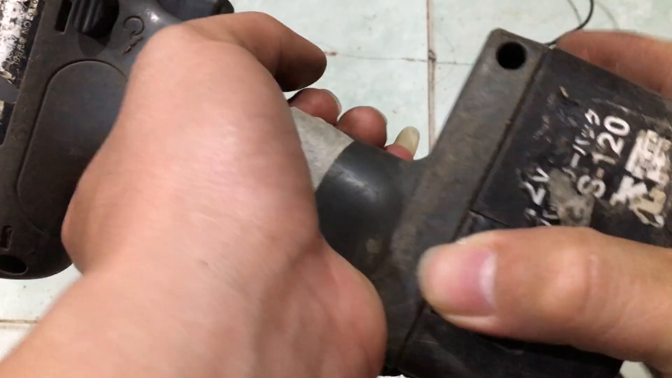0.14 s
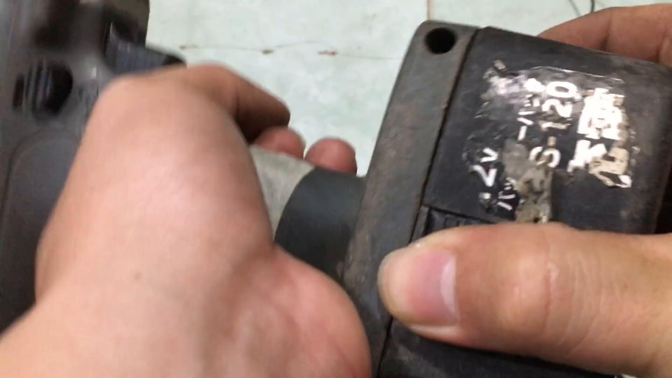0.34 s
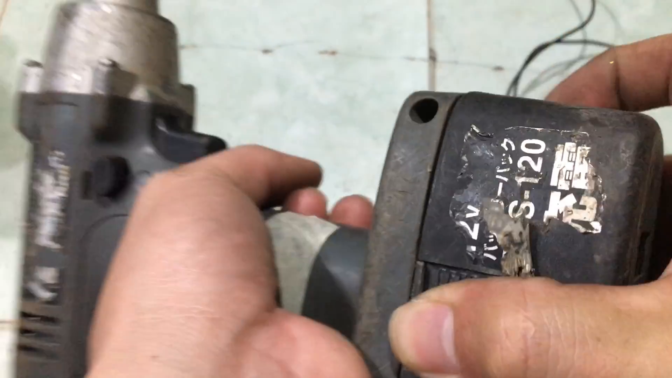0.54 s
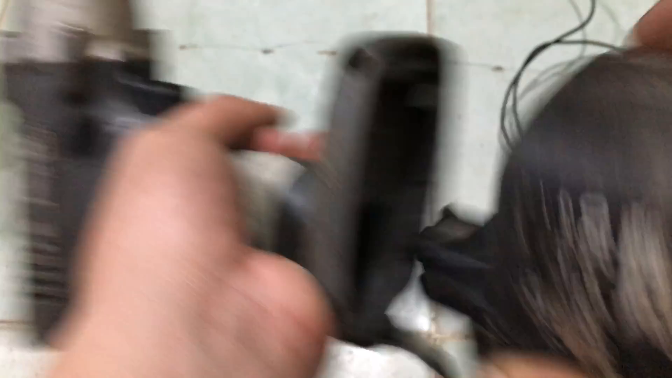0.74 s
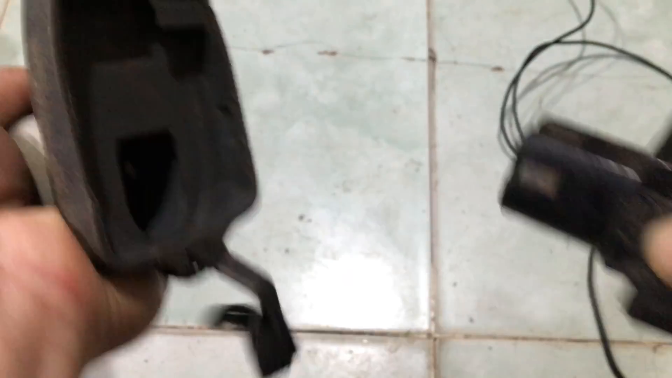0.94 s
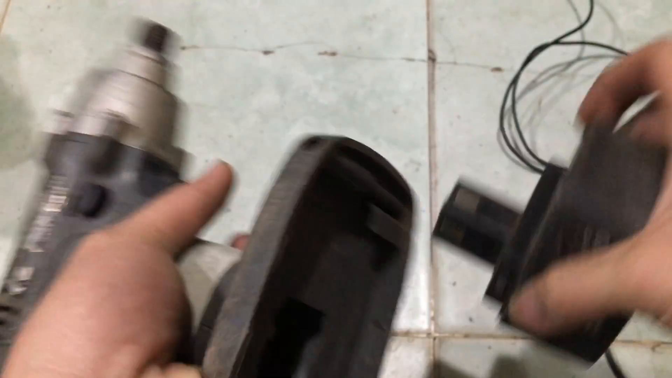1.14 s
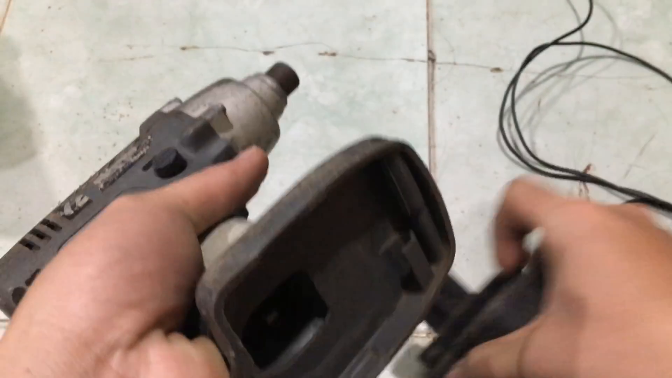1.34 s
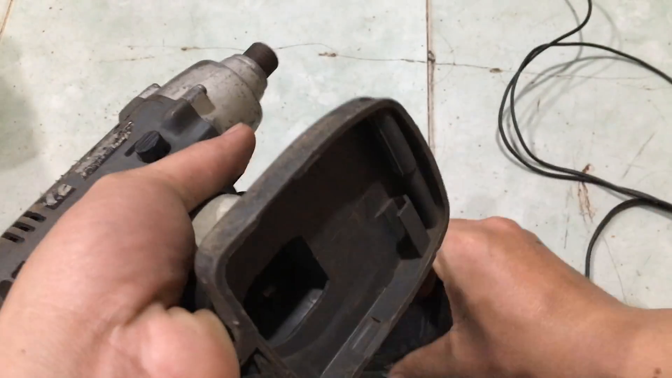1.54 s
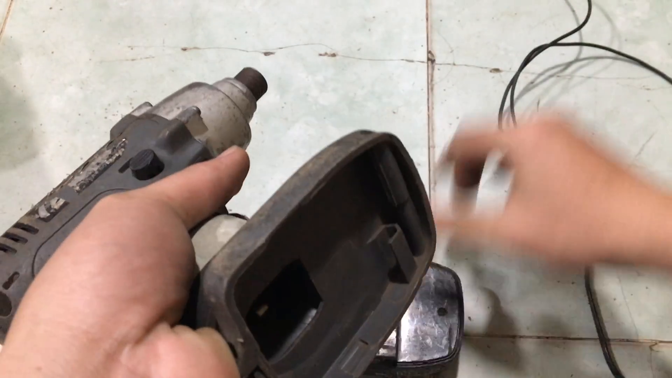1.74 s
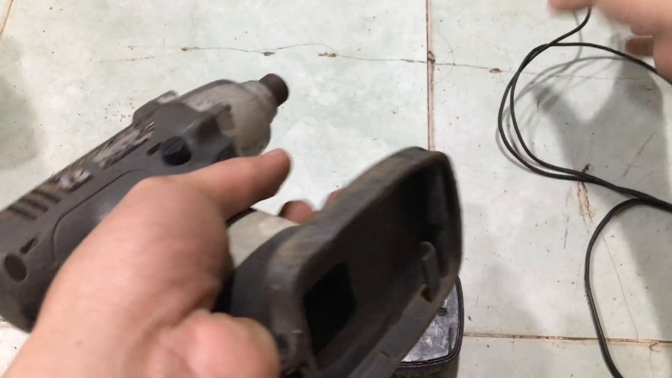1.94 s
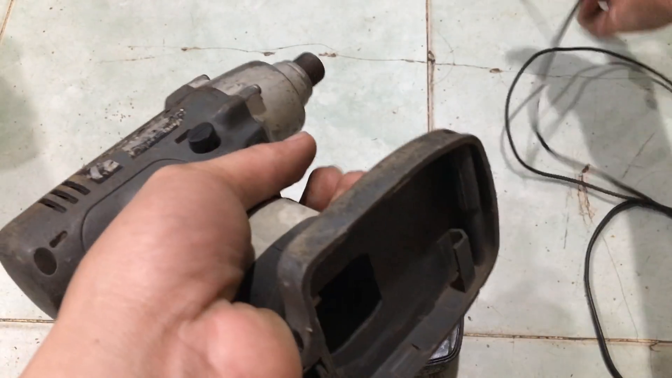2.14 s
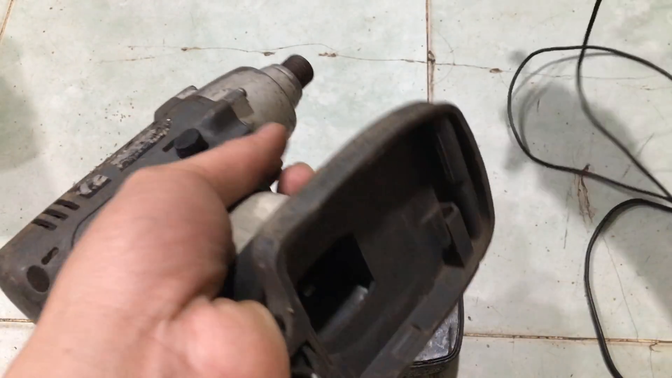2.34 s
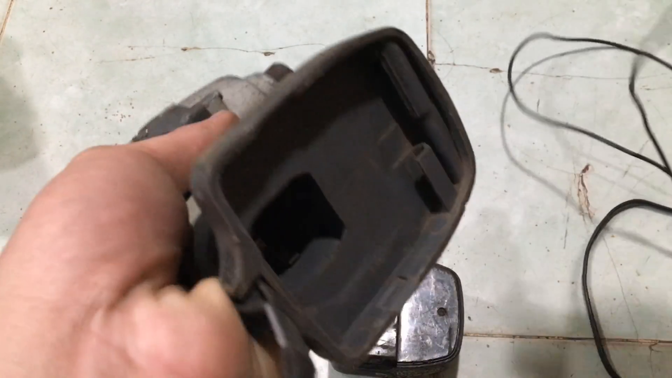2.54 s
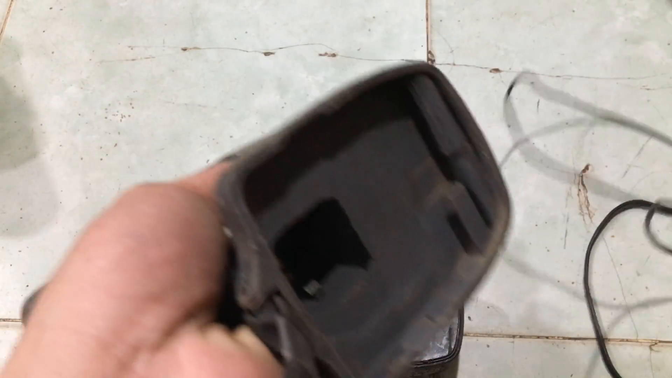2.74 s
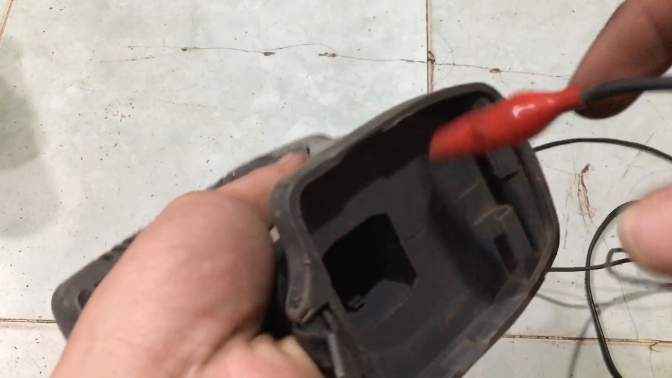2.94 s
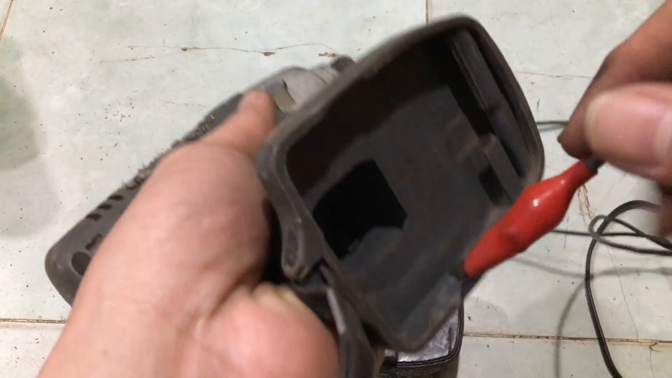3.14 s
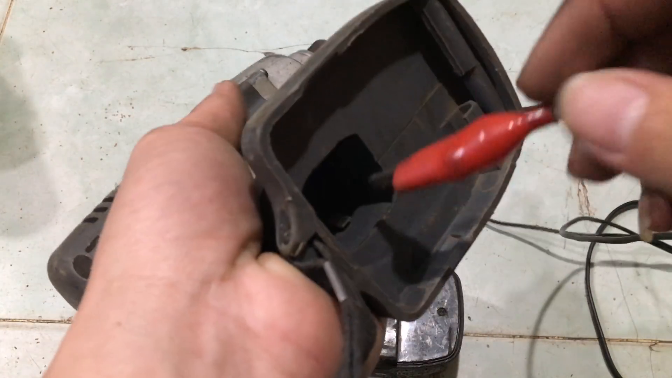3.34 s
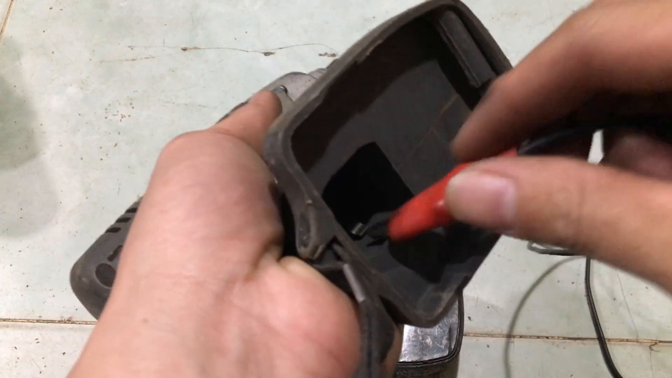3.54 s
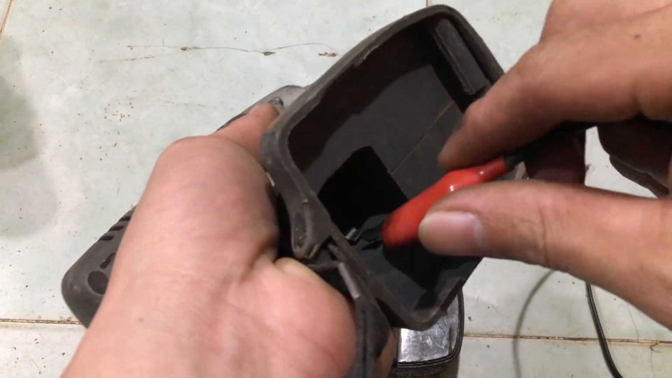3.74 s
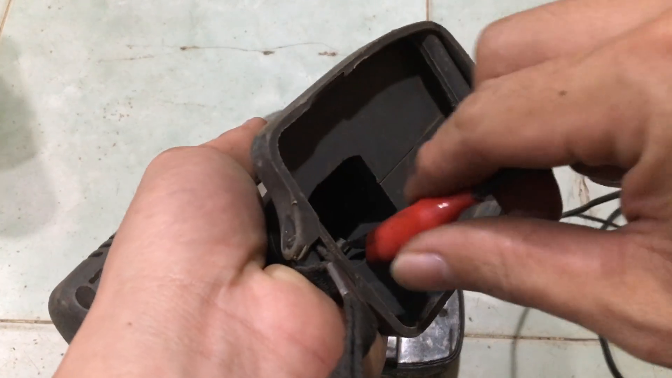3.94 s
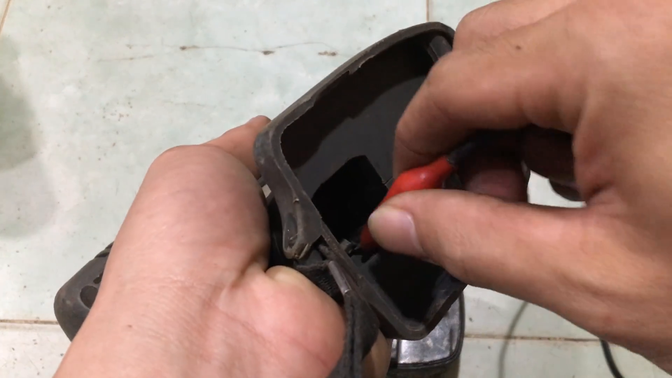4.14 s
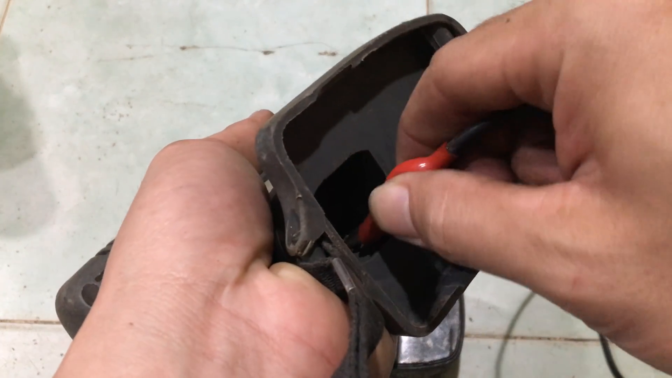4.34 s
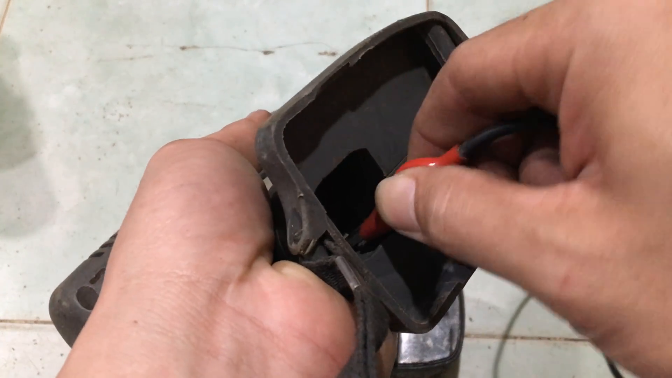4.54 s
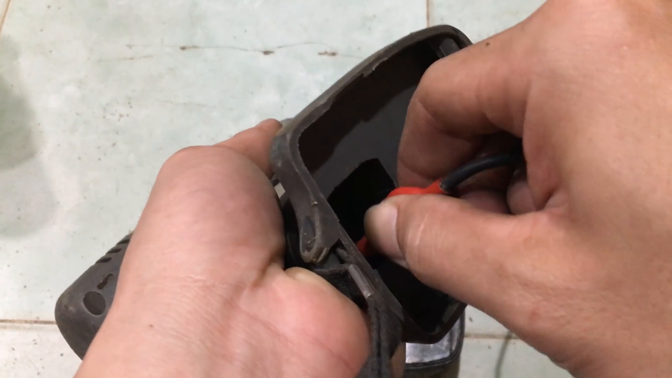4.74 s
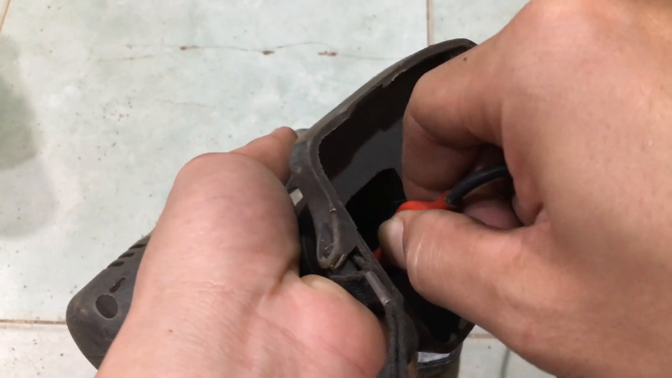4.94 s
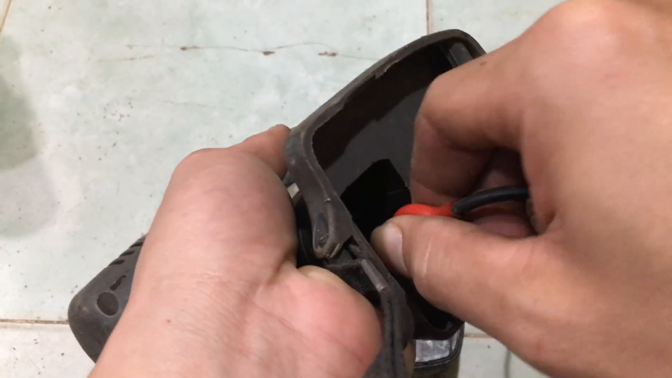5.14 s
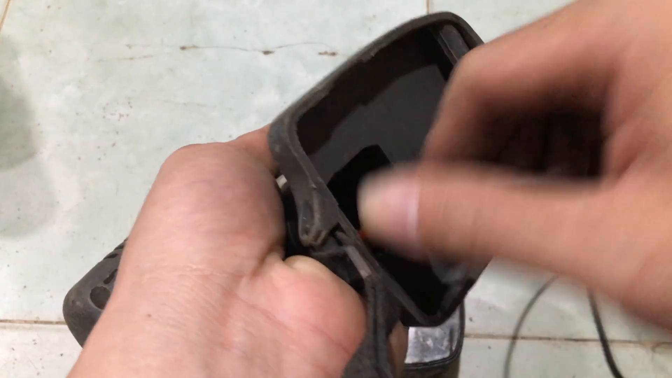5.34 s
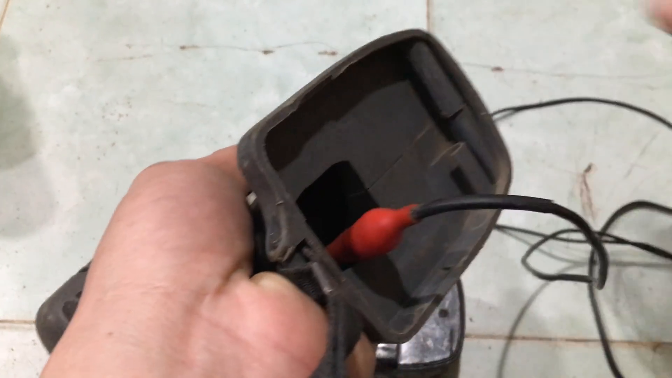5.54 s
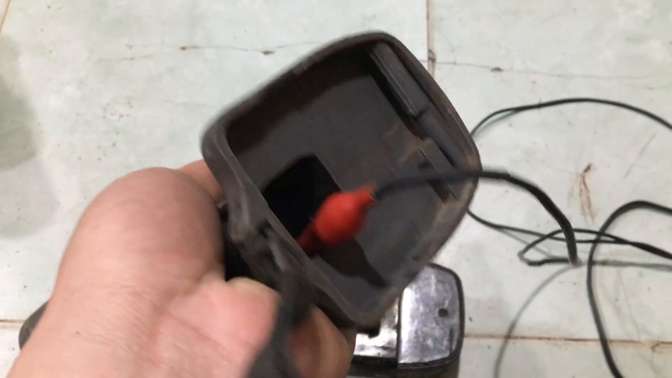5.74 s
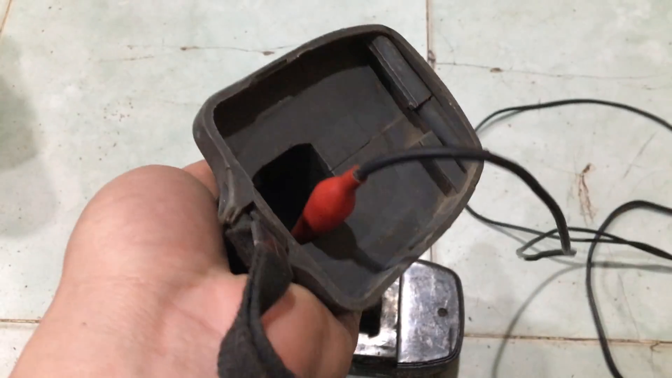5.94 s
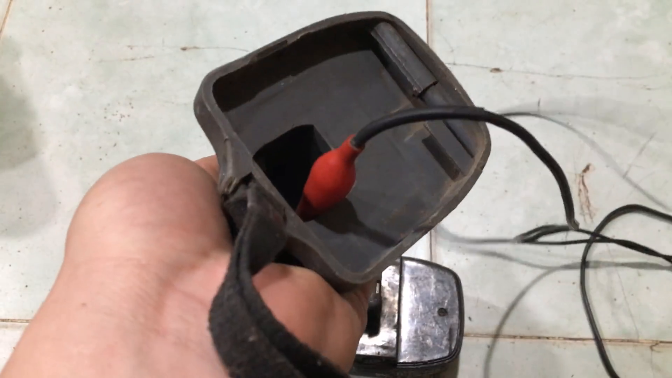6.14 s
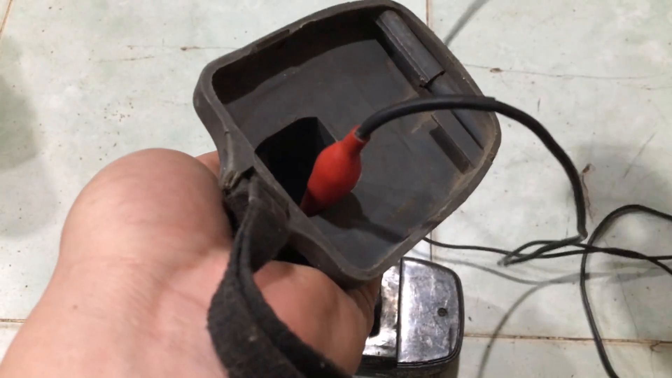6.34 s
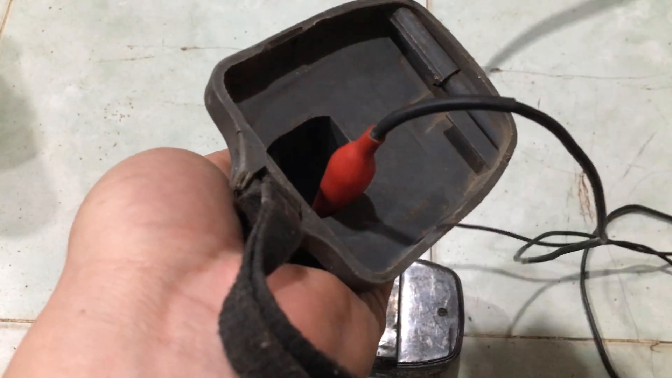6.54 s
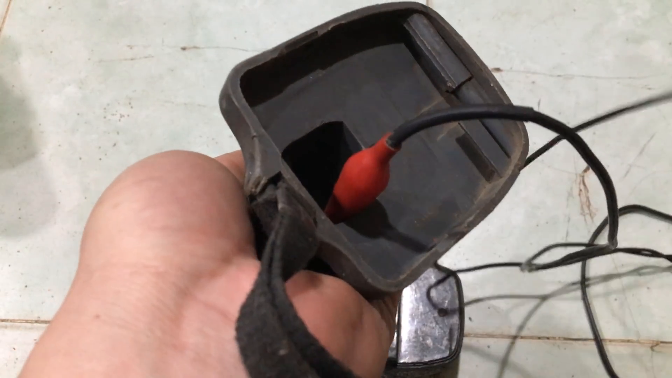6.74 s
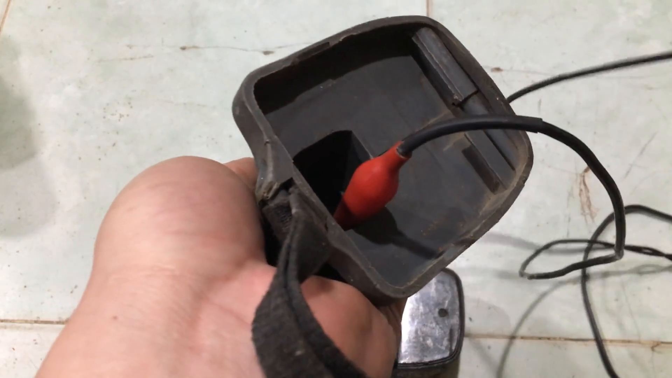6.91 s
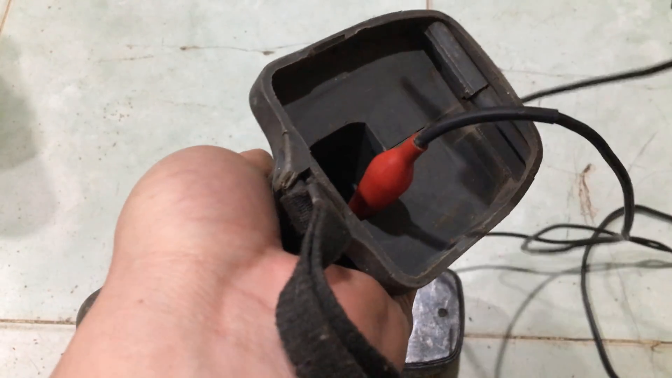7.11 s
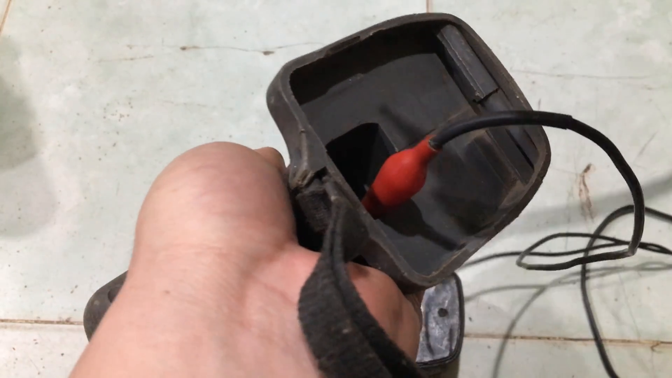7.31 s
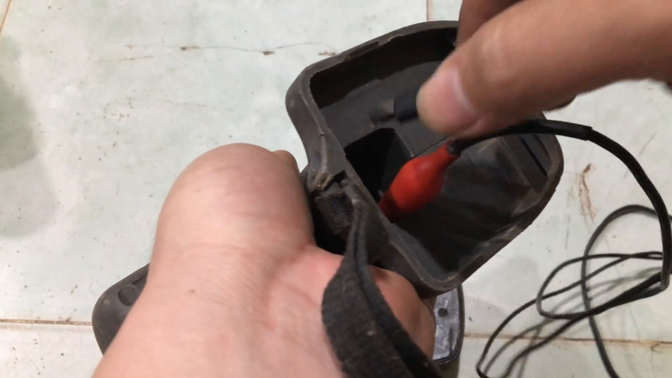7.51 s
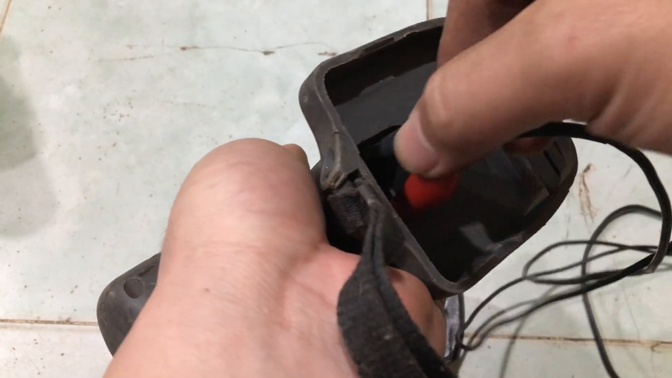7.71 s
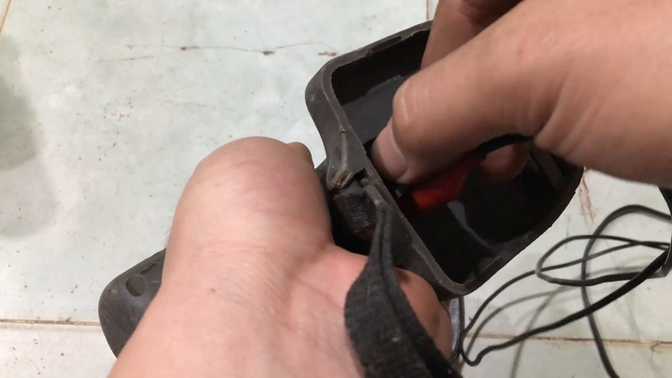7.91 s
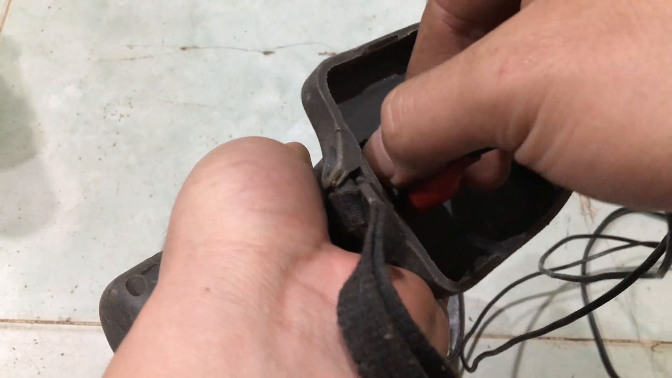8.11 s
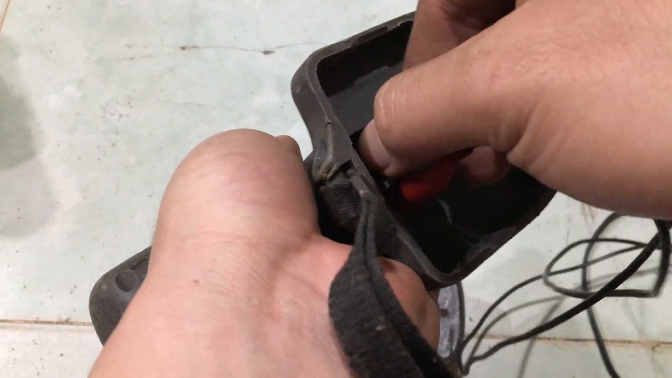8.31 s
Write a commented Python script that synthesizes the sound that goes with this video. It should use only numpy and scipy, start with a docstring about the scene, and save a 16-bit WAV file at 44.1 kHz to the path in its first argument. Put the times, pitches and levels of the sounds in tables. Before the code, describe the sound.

A battery creaks loose from a cordless drill and clacks onto tiles, then small clips tick inside the hollow plastic socket over faint fan hum.

```python
"""A faint metal tick over the hum and rush of a four-bladed fan, then hands at work on a cordless drill close by.
The battery creaks loose, slides out and rocks on tiles; spring clips on wires tick on the empty plastic socket.
Contacts are short chattering forces ringing banks of resonances; sliding is grainy noise through the case.
The fan is wavering tones plus air noise chopped by its shaft; a short tiled-room tail follows the near sounds."""
import sys
import numpy as np
from scipy import signal
from scipy.fft import rfft, irfft, next_fast_len
from scipy.io import wavfile
from scipy.ndimage import map_coordinates

SR = 44100
rng = np.random.default_rng(int(sys.argv[2]) if len(sys.argv) > 2 else 0)


def to_wav(s):
    """Save 16-bit WAV."""
    ch = np.atleast_2d(s).T  # columns
    pcm = np.round(np.clip(ch, -1, 1) * 32767)  # PCM
    wavfile.write(sys.argv[1], SR, pcm.astype(np.int16))


N = 369116
T = np.arange(N) / SR  # time in s

# resonances of the plastic battery case: pitch_hz, width_hz, level_db (relative)
CASE_MODES = [(129, 46, -3), (327, 80, -1), (462, 80, -0.5), (640, 90, 2), (960, 150, 3), (1250, 130, 5),
              (1540, 110, 5), (1940, 130, 3), (2500, 160, 3), (3200, 250, -9), (4020, 500, -12),
              (5400, 400, -12), (8400, 2000, -18), (12500, 2500, -29)]


def amp(db):
    """Decibels to linear gain."""
    return 10 ** (np.asarray(db) / 20)


def unit(x):
    """Scale to an rms of 1."""
    return x / np.sqrt(np.mean(x ** 2) + 1e-20)


def along(points, hz):
    """Interpolate (Hz, value) points on a log frequency axis."""
    f, v = np.transpose(points)
    return np.interp(np.log(hz + 1), np.log(f + 1), v)


def wobble(rate):
    """A smooth random curve with rate knots a second."""
    knots = rng.standard_normal(int(N * rate / SR) + 4)
    return map_coordinates(knots, [T * rate])


def filtered(x, response):
    """Filter x by a complex response of frequency, padded so that the end does not wrap round."""
    m = next_fast_len(x.shape[-1] + 8192)
    spectrum = rfft(x, m) * response(np.fft.rfftfreq(m, 1 / SR))
    return irfft(spectrum, m)[..., :x.shape[-1]]


def resonances(modes):
    """Causal response of a bank of (Hz, width Hz, dB) modes with alternating signs."""
    def response(f):
        return sum((-1) ** k * amp(db) * 1j * f * width / (centre * centre - f * f + 1j * f * width)
                   for k, (centre, width, db) in enumerate(modes))
    return response


def coloured(spectrum):
    """Noise of rms 1 shaped by a (Hz, dB per Hz) spectrum."""
    return unit(filtered(rng.standard_normal(N), lambda hz: amp(along(spectrum, hz))))


def favour(modes, spot_hz, lo_hz, hi_hz, db_per_octave):
    """The mode nearest the struck spot takes its pitch; the modes from lo to hi weaken with distance from it."""
    nearest = min(modes, key=lambda m: abs(np.log(m[0] / spot_hz)))
    moved = [(spot_hz, *m[1:]) if m is nearest else m for m in modes]
    return [(centre, width, db - db_per_octave * abs(np.log2(centre / spot_hz)) * (lo_hz < centre < hi_hz))
            for centre, width, db in moved]


def add(out, s, sound):
    """Mix a short sound into out at s seconds."""
    part = out[round(s * SR):][:len(sound)]
    part += sound[:len(part)]


def blow(out, s, levels_db, edges_hz, modes, contact_s, rattle, lead_s):
    """Decaying chatter plus one sharp force at lead_s rings low, middle and high modes.

    Each group has its own peak level and share of chatter (rattle)."""
    t = np.arange(2048) / SR
    chatter = rng.standard_normal(len(t))
    sharp = np.arange(len(t)) == round(lead_s * SR)
    struck = [(centre, width, db + rng.normal(0, 2)) for centre, width, db in modes]
    for group, db in enumerate(levels_db):
        lo, hi = edges_hz[group:group + 2]
        life_s = contact_s * 0.9 ** group  # higher modes are driven more briefly
        force = rattle[group] * chatter * np.exp(-t / life_s) + sharp
        members = [m for m in struck if np.searchsorted(edges_hz, m[0]) == group + 1]
        ring = filtered(force, resonances(members))
        band = signal.butter(1, (.8 * lo, 1.15 * hi), "band", fs=SR, output="sos")
        ring = signal.sosfilt(band, ring)
        # neighbouring modes keep opposite signs across groups
        sign = (-1) ** sum(m[0] < lo for m in struck)
        peak = np.abs(signal.hilbert(ring)).max()
        add(out, s, sign * amp(db) * ring / peak)


def knocks():
    """Battery case on socket, tiles and hand: padded, thumpy contacts last longer, harder blows are brighter."""
    # knocks: start_s, level_db (peak of middle modes), thump_db (low over middle), spot_hz (favoured pitch)
    knock_list = [(0.408, -37, -24, 1890), (0.476, -26, -11, 1310), (0.552, -30.5, -7, 1300),
                  (0.59, -32, 0, 1100), (0.635, -35, -28, 1640), (0.7476, -23, -5, 1130),
                  (0.765, -24.5, -7.5, 2410), (0.774, -35, -17, 3100), (0.782, -25, -6, 940),
                  (0.7865, -27, -11, 1960), (0.8069, -14.5, -13, 830), (0.8185, -33, -25, 3330),
                  (0.8202, -20, -13, 930), (0.8234, -26, -15, 1230),  (0.946, -31, -8, 880),
                  (0.978, -30.5, -19, 810), (1.4, -31.5, -4.5, 840), (1.6299, -12, -14.5, 1256),
                  (1.6328, -15, -23, 974), (1.658, -28, -12, 1110), (1.695, -34, -4, 1230),
                  (1.729, -39, 0, 1110), (1.747, -5, -13, 2515), (1.7492, -8, -17.5, 1920),
                  (1.7528, -21.5, -24, 1440), (1.778, -25, -17, 1380), (1.7982, -14, -15.5, 1300),
                  (1.8022, -18, -28, 1800), (1.821, -30, -11, 1580), (1.841, -31.5, -1.5, 1440),
                  (1.874, -40, 1, 810), (1.955, -36.5, -2, 1130), (1.962, -29, -2, 1200),
                  (2.095, -43, 2.5, 1550), (2.153, -42.5, 3.5, 1120), (2.205, -37, 2.5, 1160),
                  (2.213, -48.5, 15, 1200), (2.747, -28.5, -7.5, 1300), (2.804, -37, -3, 1180),
                  (2.855, -37, -4, 1160), (2.878, -38.5, -1, 1230), (2.928, -40, 4, 1250),
                  (3.151, -31.5, -1.5, 1220), (3.247, -38.5, -3.5, 1360), (3.616, -35, -8, 1230),
                  (5.5064, -33, -7, 1490), (7.235, -24.5, -9, 970), (8.27, -37, -25, 1290)]
    hollow_mode = (375, 85, 8)  # Hz, width Hz, dB
    high_db, high_db_per_octave, high_db_per_db = -13.5, 1, 0.2  # for a 0 dB blow on a 1 kHz spot
    out = np.zeros(N)
    for s, db, thump_db, spot_hz in knock_list:
        body = CASE_MODES
        if 2.5 < s < 4:  # the hand knocks the empty drill: one hollow mode replaces three low ones
            body = [CASE_MODES[0], hollow_mode, *CASE_MODES[4:]]
        favoured = favour(body, spot_hz, 700, 3500, db_per_octave=10)
        edge_db = high_db + high_db_per_db * db + high_db_per_octave * np.log2(spot_hz / 1000)
        contact_s = 0.012 * amp(0.53 * np.clip(thump_db, -13, 0))
        rattle = contact_s * np.array([5, 6, 20])  # longer contacts also chatter more
        blow(out, s, (db + thump_db, db, db + edge_db), (60, 700, 3500, 18000), favoured,
             contact_s, rattle, lead_s=.0002)
    return out


def battery_slips():
    """The battery lets go in stick-slip jerks that slow down and lose their bright edge."""
    # jerks: start_s, level_db (peak of middle modes), thump_db (low over middle)
    slips = [(0.226, -42, -8), (0.237, -30, -13), (0.251, -29.5, -14), (0.265, -24.5, -16),
             (0.278, -29.5, -15), (0.291, -26.5, -13), (0.304, -27.5, -18), (0.32, -27.5, -12),
             (0.343, -29, -6), (0.365, -27.5, -15), (0.3941, -26, -15)]
    # latch resonances: pitch_hz, width_hz, level_db (relative)
    latch_modes = [(620, 105, 0), (1080, 500, 5), (1800, 500, 3.5), (2880, 280, 10), (4200, 270, -8),
                   (5400, 290, -4), (6730, 740, -4), (9300, 780, -6.5), (11450, 640, -6)]
    dulling_db_per_s = 38
    out = np.zeros(N)
    for s, db, thump_db in slips:
        edge_db = -dulling_db_per_s * (s - slips[0][0])  # high modes over middle ones
        blow(out, s, (db + thump_db, db, db + edge_db), (400, 700, 3500, 18000), latch_modes,
             contact_s=.0012, rattle=(.05, .09, .2), lead_s=.0006)
    return out


def socket_ticks():
    """Small metal parts strike the plastic socket, each ringing the modes near its struck spot most."""
    # ticks: start_s, level_db (peak of middle modes), hollow_db and edge_db (low and high over middle),
    # spot_hz (favoured pitch)
    ticks = [(0.0314, -48, -10, 19.5, 6040), (0.5509, -35.5, 1, -4, 3440), (0.7386, -30, 0, -9, 4630),
             (0.98, -36, -17, -6, 5440), (0.998, -37, -4, 0, 4600), (1.0098, -41, 1, -7, 4500),
             (2.16, -40, 0, 7.5, 6340), (3.157, -31.5, -8, -12, 2920), (3.2673, -22.5, 6, -20, 4240),
             (3.6008, -40, 11.5, 1, 3320), (4.1909, -42, 8.5, 3, 6400), (4.4608, -25.5, -9, -6, 2850),
             (4.6804, -33, -3, -7, 3160), (5.1794, -20.5, 3, 2, 3580), (5.486, -29.5, -12, -14, 4360),
             (5.4882, -36, -3, -12, 4070), (5.5058, -28.5, -20, 0, 2960), (7.2344, -33, 4, -25, 3050)]
    # socket resonances: pitch_hz, width_hz, level_db (relative)
    socket_modes = [(1470, 190, 0), (2060, 250, -6), (2920, 300, -3), (3580, 260, -1), (4100, 250, -7),
                    (5200, 400, -10), (6050, 300, 0), (7300, 700, -10), (9100, 450, -2), (10200, 700, -2),
                    (12400, 600, -8), (14300, 550, -1)]
    out = np.zeros(N)
    for s, db, hollow_db, edge_db, spot_hz in ticks:
        favoured = favour(socket_modes, spot_hz, 2500, 8000, db_per_octave=12)
        blow(out, s, (db + hollow_db, db, db + edge_db), (1100, 2500, 8000, 18000), favoured,
             contact_s=.0014, rattle=(.04, .04, .08), lead_s=.0002)
    return out


def rubbing():
    """Sliding and rocking plastic: uneven friction grains ring the case under a crackling hiss."""
    # strokes: start_s, hold_s, body_db, hiss_db (over the body), fade_db_per_s
    rubs = [(0.744, 0.072, -42.5, 0, 900), (1.627, 0.003, -38.5, -13, 400), (1.745, 0.075, -36, -15, 447),
            (5.473, 0.018, -59, 2, 597), (7.234, 0.047, -51, -22, 500)]
    # hiss spectrum: pitch_hz, level_db (per Hz)
    slide_spectrum = [(1760, -5), (3000, -4.5), (6000, -10), (8700, -12.5), (12500, -16), (16000, -28)]
    attack_s = 0.0032
    grains = rng.standard_normal(N) * amp(3.5 * wobble(300))
    favoured = favour(CASE_MODES, 1250, 400, 5000, db_per_octave=7)
    body = unit(filtered(grains, resonances([m for m in favoured if 400 <= m[0] < 5000])))
    crackle = rng.standard_normal(N) * amp(5 * rng.standard_normal(N) + 3 * wobble(400))
    hiss = unit(filtered(crackle, lambda hz: amp(along(slide_spectrum, hz))))
    out = np.zeros(N)
    for s, hold_s, body_db, hiss_db, fade_db in rubs:
        rise = np.clip((T - s) / attack_s, 0, 1)
        fade = amp(-fade_db * np.clip(T - s - attack_s - hold_s, 0, 1))
        # the hiss fades twice as fast as the body
        out += amp(body_db) * rise * fade * (body + amp(hiss_db) * fade * hiss)
    return out


def room(x):
    """Tiled-room tail: noise in which each frequency dies at its own speed, of unit energy."""
    # decay times: pitch_hz, t60_s
    decay_times = [(200, 0.86), (1500, 0.29), (10000, 0.094)]
    hz, t, z = signal.stft(rng.standard_normal(SR // 2), SR, nperseg=256)
    decay = amp(-60 * t / along(decay_times, hz)[:, None])
    tail = signal.istft(z * decay, SR, nperseg=256)[1]
    delayed = np.pad(x, (250, 0))  # samples
    return signal.fftconvolve(delayed, tail / np.linalg.norm(tail))[:N]


def fan_hum(turn):
    """Wavering tones at multiples of the shaft speed, and one steady-pitched tone of uneven level."""
    # tones: shaft_order, level_db (rms before wavering)
    tones = [(5, -67.5), (12, -61.5), (16, -66.5), (28, -75)]
    mains_hz, mains_db = 102.6, -68.5
    hum = np.zeros(N)
    for order, db in tones:
        level = np.sqrt(2) * amp(db + 1.5 * wobble(7.7))
        hum += level * np.sin(order * turn + rng.uniform(0, 2 * np.pi))
    mains_level = np.sqrt(2) * amp(mains_db + 3.0 * wobble(3.35))
    return hum + mains_level * np.sin(2 * np.pi * mains_hz * T)


def fan_air(turn):
    """Air noise in three layers: steady rumble, rush chopped by the shaft, and deeper-chopped treble fizz."""
    # chopping: shaft_order, depth (0-1)
    chops = [(1, 0.2), (3, 0.16), (4, 0.12), (8, 0.3)]
    # spectra of the air and of its treble: pitch_hz, level_db (per Hz)
    air_spectrum = [(24, -37), (40, -2.5), (108, -12.5), (140, -5), (251, -13), (327, -7.5), (417, -17.5),
                    (587, -22), (1140, -10.5), (1320, -17), (1520, -13.5), (1820, -21), (2960, -23.5),
                    (5000, -32), (6500, -34.5), (11000, -120)]
    fizz_spectrum = [(2940, -24), (6090, -6), (7790, -6), (9440, -6), (10600, -10.5), (12900, -6.5),
                     (15800, -16.5)]
    # levels over time: time_s, rush_db, fizz_db
    air_levels = [(0, -51, -65.5), (8.37, -52, -68)]
    rumble_db = -54.5
    # the orders line up once a turn: a faint treble puff
    chop = sum(depth * np.cos(order * turn) for order, depth in chops)
    s, rush_db, fizz_db = np.transpose(air_levels)
    air = coloured(air_spectrum)
    rumble = filtered(air, lambda hz: 1 / (1 + (hz / 500) ** 4))
    breeze = amp(.7 * wobble(8))
    rush = amp(np.interp(T, s, rush_db)) * breeze * (1 + .4 * chop) * (air - rumble)
    flicker = amp(2.63 * wobble(6.8) + 0.69 * wobble(72))
    flicker *= np.exp(chop * np.exp(0.28 * wobble(17)))  # the chopping depth varies too
    fizz = amp(np.interp(T, s, fizz_db)) * unit(flicker * coloured(fizz_spectrum))
    return amp(rumble_db) * rumble + rush + fizz


def fan():
    """Hum and air noise share one slightly unsteady shaft angle."""
    shaft_hz = 11.52 * (1 + 0.00306 * wobble(1.5))
    turn = 2 * np.pi * np.cumsum(shaft_hz) / SR
    return fan_hum(turn) + fan_air(turn)


def scene():
    """Close handling sounds, their room tail and the fan, in mono."""
    near = knocks() + battery_slips() + socket_ticks() + rubbing()
    return (near + amp(-19.0) * room(near) + fan())[None]


def record(dry):
    """The microphone drops the deepest bass, and nothing passes above the band limit."""
    top_hz = 16600
    return filtered(dry, lambda hz: (hz < top_hz) / (1 + (40 / (hz + 1)) ** 6))


dry = scene()
out = record(dry)
to_wav(out)
```